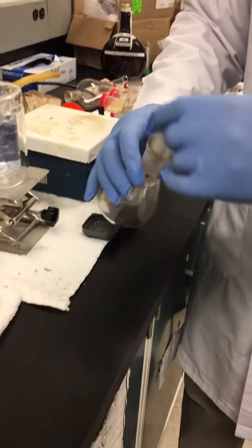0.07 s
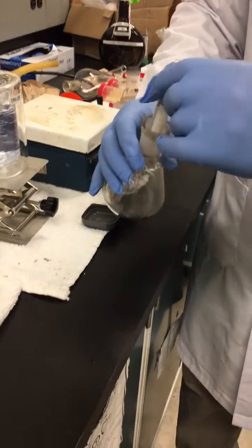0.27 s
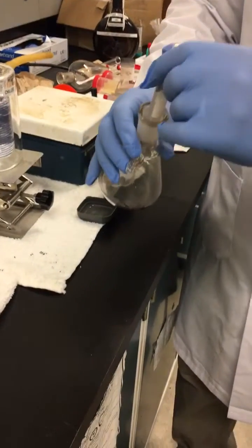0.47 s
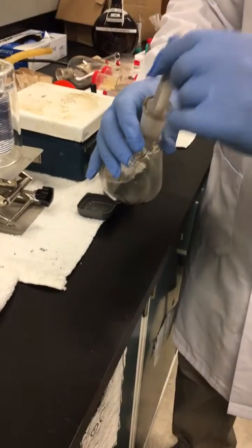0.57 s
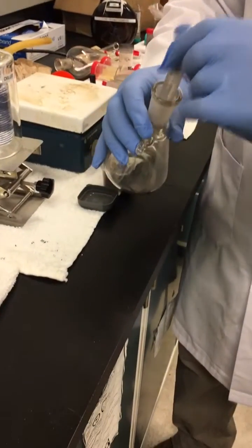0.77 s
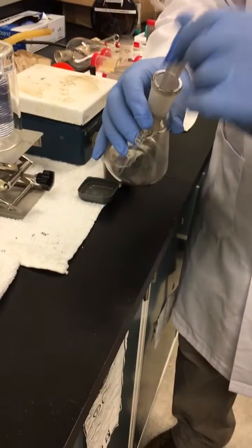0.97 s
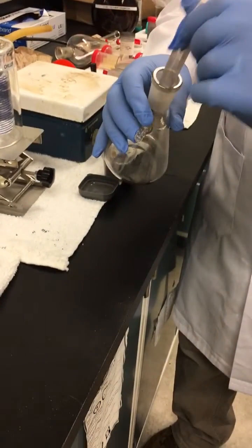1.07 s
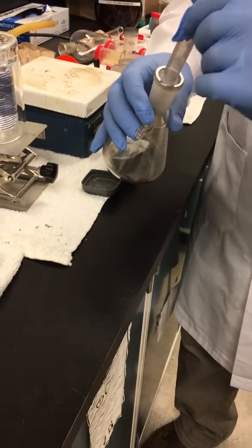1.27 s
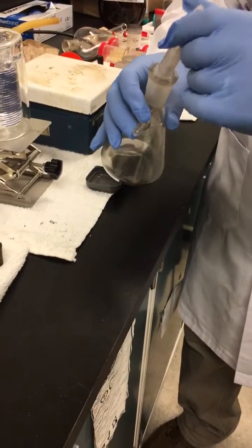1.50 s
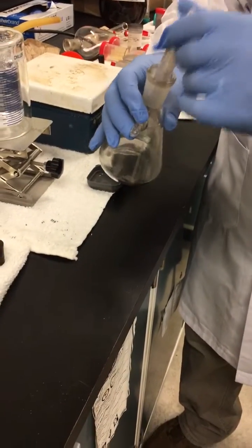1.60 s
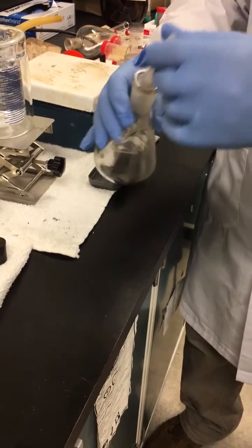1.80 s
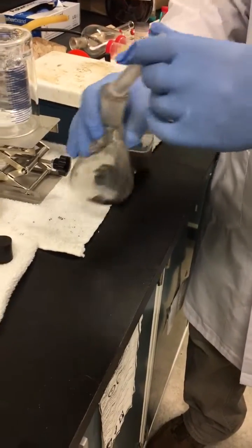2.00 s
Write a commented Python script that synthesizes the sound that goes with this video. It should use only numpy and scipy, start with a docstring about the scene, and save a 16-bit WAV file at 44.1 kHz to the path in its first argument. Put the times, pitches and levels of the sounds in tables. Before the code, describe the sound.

Close by, a glass stopper is worked loose from a flask. Quick, sharp clinks come first, then softer ground-glass scraping with light taps, and finally muffled knocks. Ventilation and equipment hum faintly in the small lab.

```python
"""Ventilation rumbles and equipment hums in a small laboratory, from start to finish.
A glass stopper is worked loose in the neck of a hand-held flask. First it clinks and rattles against
the rim, each impact exciting the modes of the glass. From about 0.4 s it slides with a fine frictional
scrape of ground glass, among light knocks, two faint clinks and a squeak. From about 1.4 s it ends in
dull knocks, damped by the gloves that hold it."""
import sys
import numpy as np
from scipy import signal
from scipy.fft import rfft, irfft
from scipy.io import wavfile

SR = 44100
rng = np.random.default_rng(int(sys.argv[2]) if len(sys.argv) > 2 else 0)


def wav_out(sig):
    """Save sig, one row per channel (or a flat mono array), as 16-bit PCM at SR to the path in sys.argv[1]."""
    wavfile.write(sys.argv[1], SR, np.round(np.clip(np.atleast_2d(sig).T, -1, 1) * 32767).astype(np.int16))


N = 90404
T = np.arange(N) / SR


def from_db(db):
    """Amplitude ratio of a level: tenfold for every 20 dB."""
    return 10 ** (np.asarray(db) / 20)


def unit_rms(x):
    """Normalisation to unit mean power."""
    return x / np.sqrt(np.mean(x ** 2) + 1e-20)


def curve(rows):
    """Linear interpolation between (time [s], level [dB]) points."""
    return np.interp(T, *np.transpose(rows))


def decay(t60):
    """Exponential decay: 60 dB in t60 seconds."""
    return from_db(-60 * T / t60)


def convolve(x, response):
    """A linear system's output is its input convolved with its impulse response."""
    return signal.fftconvolve(x, response)[:N]


def colour(x, spectrum):
    """Minimum-phase filter of unit power gain, falling 24 dB per octave outside the given spectrum."""
    hz, db = np.transpose(spectrum)
    grid = np.maximum(np.fft.rfftfreq(2 * N, 1 / SR), 1)
    octaves_outside = np.abs(np.log2(grid / np.clip(grid, hz[0], hz[-1])))
    gain = unit_rms(from_db(np.interp(np.log(grid), np.log(hz), db) - 24 * octaves_outside))
    cepstrum = irfft(np.log(gain + 1e-6))[:N]
    cepstrum[1:] *= 2  # a one-sided cepstrum makes the filter causal
    return irfft(rfft(x, 2 * N) * np.exp(rfft(cepstrum, 2 * N)))[:N]


def drift(hz):
    """Random fluctuation: noise low-passed at hz, with unit rms."""
    rolloff = 1 + (np.fft.rfftfreq(N, 1 / SR) / hz) ** 4
    return unit_rms(irfft(rfft(rng.standard_normal(N)) / rolloff, N))


def ring(times, db, hz, t60, build_s=.0005, flutter_hz=70):
    """A damped mode sums its blows' energy; room reflections make it waver slightly in level and phase."""
    power = np.zeros(N)
    for onset, level, ring_s in np.broadcast(times, db, t60):
        start = min(int(onset * SR), N - 1)
        age = T[:min(int(2 * ring_s * SR), N - start)]
        envelope = from_db(level - 60 * age / ring_s) * (1 - np.exp(-age / build_s))
        power[start:start + len(age)] += envelope ** 2
    phase = 2 * np.pi * (hz * T + rng.random()) + .35 * drift(flutter_hz)
    flutter = from_db(1.8 * drift(flutter_hz))
    return np.sqrt(power) * flutter * np.sin(phase)


def bursts(times, db, envelope, spectrum):
    """Dense, short-lived overtones merge into noise, so successive impacts add in power."""
    impacts = np.zeros(N)
    np.add.at(impacts, np.clip((times * SR).astype(int), 0, N - 1), from_db(2 * db))
    power = np.maximum(convolve(impacts, envelope ** 2), 0)
    return colour(np.sqrt(power) * rng.choice([-1, 1], N), spectrum)


def ventilation():
    """Stationary broadband noise: a low rumble of air under a faint hiss."""
    # spectra of the rumble and the hiss: (frequency [Hz], relative density [dB])
    rumble_spectrum = [(36, -7), (118, -0.5), (146, -4.5), (271, -8.5), (385, -19.5), (777, -28),
                       (1020, -25), (1300, -30.5), (2800, -40.5)]
    hiss_spectrum = [(1500, -2), (10000, -13), (16000, -8)]
    rumble = from_db(-48.5) * colour(rng.standard_normal(N), rumble_spectrum)
    hiss = from_db(-68) * colour(rng.standard_normal(N), hiss_spectrum)
    return rumble + hiss


def equipment_hum(waver_db=.5, waver_hz=4.7, drone_hz=121.4, drone_db=-5):
    """A line spectrum under slow amplitude modulation: four tones waver, a drone swells and sinks."""
    # steady equipment tones: (frequency [Hz], rms level [dB])
    hum_lines = [(59, -57), (177, -59), (268.7, -55.5), (698.5, -74)]
    # envelope of the strongest line: (time [s], relative level [dB])
    drone_levels = [(0, -38), (.12, -50.5), (.45, -59.5), (.54, -43.5), (1.08, -45.5), (1.22, -36.5),
                    (1.42, -49), (1.7, -58.5), (1.82, -45)]
    tones = [(hz, db + waver_db * drift(waver_hz)) for hz, db in hum_lines]
    tones.append((drone_hz, curve(drone_levels) + drone_db))
    return sum(np.sqrt(2) * from_db(db) * np.sin(2 * np.pi * (hz * T + rng.random())) for hz, db in tones)


def chirps(per_s=550, resonance_hz=6850, spread_octaves=.16, t60=.016, pitches=16):
    """Impulse excitation: random slips each start a damped sinusoid near the stopper's resonance."""
    out = 0
    for hz in resonance_hz * 2 ** (spread_octaves * np.linspace(-1, 1, pitches)):
        slips = (rng.random(N) < per_s / pitches / SR) * rng.uniform(.5, 1, N)
        out = out + convolve(slips, decay(t60) * np.sin(2 * np.pi * hz * T))
    return unit_rms(out)


def scrape(grains_per_s=4500, grain_spread_db=2.4, gain_db=-2, judder_db=1.8, judder_hz=55):
    """Sliding friction: ground glass gives a stream of tiny impacts and chirps, swelling at each rub."""
    # light drag of the sliding stopper: (time [s], relative level [dB])
    drag = [(.42, -80), (.8, -66), (1.11, -60), (1.14, -76), (1.2, -70), (1.46, -69), (1.52, -95)]
    # short rubs against the neck: (centre time [s], half-power duration [s], relative level [dB])
    rubs = [(.01, 0.042, -60), (0.454, 0.037, -61), (0.515, 0.021, -58.5), (0.571, 0.02, -56),
            (0.642, 0.013, -56.5), (.684, 0.013, -51), (.714, 0.008, -53.5), (0.752, 0.026, -54),
            (0.807, 0.018, -59), (0.859, .016, -54.5), (0.9, 0.045, -58), (0.946, 0.017, -53.5),
            (0.977, 0.013, -59), (1.023, 0.079, -60), (1.074, 0.025, -51), (1.105, 0.023, -54),
            (1.174, .01, -61), (1.205, 0.035, -56.5), (1.315, 0.013, -53.5), (1.445, 0.013, -59.5),
            (1.75, .022, -67)]
    # spectrum of the grains: (frequency [Hz], relative density [dB])
    grain_spectrum = [(1500, -8.5), (2750, -15), (3450, -1.5), (4000, -11), (6800, -8.5), (9000, -2.5),
                      (10300, -11), (11500, -6), (15500, -12.5)]
    sizes = from_db(grain_spread_db * np.minimum(rng.exponential(1, N), 4)) * rng.choice([-1, 1], N)
    contacts = rng.random(N) < grains_per_s / SR
    grains = colour(unit_rms(sizes * contacts), grain_spectrum)
    rub_power = sum(from_db(2 * db) * .5 ** ((2 * (T - centre) / length) ** 2)
                    for centre, length, db in rubs)
    envelope = np.sqrt(from_db(2 * curve(drag)) + rub_power)
    judder = from_db(gain_db + judder_db * drift(judder_hz))
    return envelope * judder * (grains + from_db(1) * chirps())


def clinks(splash_db=-9.5, splash_t60=.05, reflection_db=-.5, reflection_s=.0056):
    """Modal ringing: the point of impact weights the modes, and a lingering contact damps them."""
    # blows on the rim: (time [s], level of each of the four registers [dB], decay time factor [1])
    blows = [(0.0815, -38, -69, -70, -72, 0.1), (0.2164, -19, -14.5, -32, -19.5, 0.34),
             (0.222, -60, -46, -17, -18.5, 0.82), (0.229, -30, -48, -34, -36, 1.3),
             (0.276, -30, -30.5, -48, -51, 0.7), (0.2817, -20.5, -53, -49, -29.5, 1.33),
             (0.285, -35, -20.5, -40, -38, 0.29), (0.3112, -24.5, -32.5, -34, -56, 0.55),
             (0.3395, -45, -46, -40, -51, 1.1), (0.404, -33, -37, -39, -47, 0.77),
             (1.1568, -56, -56, -28.5, -64, 0.17), (1.228, -42, -58, -42, -50, 0.57)]
    # registers that group the modes: (centre frequency [Hz])
    registers_hz = [3400, 6000, 6800, 11000]
    # modes of the glass: (frequency [Hz])
    modes_hz = [3388, 3607, 5555, 6096, 6808, 10185, 10429, 10994, 11110, 11290, 11781, 12290, 14730, 15380]
    # the same modes, in order: (relative level [dB], t60 [s])
    modes = [(-3.5, 0.14), (-15.5, .07), (-17.5, 0.11), (1.5, 0.063), (-3.5, 0.053), (-12.5, 0.037),
             (-4, 0.036), (-2, 0.045), (-17, 0.077), (-15, .05), (-3.5, 0.04), (-18, .055), (-17, .05),
             (-15, 0.05)]
    # splash of brief overtones at each blow: (frequency [Hz], relative density [dB])
    splash_spectrum = [(700, -25.5), (2700, -18), (3500, 8), (4300, -12), (6000, 2), (8500, -3.5),
                       (11000, 5), (13500, -14), (15300, -6.5)]
    times, *register_db, decay_factor = np.transpose(blows)
    out = bursts(times, register_db[-1] + splash_db, decay(splash_t60), splash_spectrum)
    for hz, (db, t60) in zip(modes_hz, modes):
        register = np.argmin(np.abs(np.log(hz / np.array(registers_hz))))
        onsets, levels, ring_s = times, register_db[register] + db, t60 * decay_factor
        if register > 0:  # the bench reflects the upper modes a moment later
            onsets = np.r_[onsets, onsets + reflection_s]
            levels = np.r_[levels, levels + reflection_db]
            ring_s = np.r_[ring_s, ring_s]
        out = out + ring(onsets, levels, hz, ring_s)
    return out


def knocks(body_t60=.015, tick_t60=.0054, click_t60=.01155, loose_s=1.35, grip_db=-6):
    """Heavy damping by the gloves leaves a hollow body, a bright tick, a sharp click and little ring."""
    # stopper striking the neck: (time [s], body level [dB], tick level [dB], click level [dB])
    contacts = [(0.0824, -52, -47, -61), (0.1059, -44.5, -39, -50), (0.2171, -50, -27, -32),
                (0.272, -40.5, -39, -43), (0.2812, -60, -23, -27.5), (0.616, -47, -50, -51),
                (0.735, -50.5, -49, -79), (0.746, -48.5, -43.5, -58), (0.7936, -47.5, -39.5, -59),
                (0.948, -54, -45.5, -60), (1.1557, -47, -42, -62), (1.3994, -45, -41, -46.5),
                (1.4797, -47, -45.5, -48.5), (1.487, -48, -54, -53), (1.4942, -38.5, -44, -61),
                (1.6045, -42.5, -44, -43.5), (1.6122, -43.5, -45.5, -54), (1.6228, -46, -47.5, -61),
                (1.7847, -47, -54, -60), (2.021, -41.5, -40, -61), (2.0447, -43, -46, -67)]
    # spectra of the three parts: (frequency [Hz], relative density [dB])
    body_spectrum = [(300, -35), (700, -5), (1000, 1), (1600, -3), (2300, 0), (2800, -13), (4500, -14.5),
                     (8000, -14)]
    tick_spectrum = [(2000, -23), (3400, 3), (5600, -1.5), (6100, 7), (6900, 9), (7800, -6.5), (9100, 3),
                     (10300, -25.5)]
    click_spectrum = [(9500, -3), (13500, -.5), (15500, -4.5)]
    # modes that still ring under the gloves: (frequency [Hz], relative level [dB], t60 [s])
    body_modes = [(880, -12, 0.048), (1115, -5.5, 0.032), (1565, -12.5, 0.1), (2055, -15.5, .05),
                  (2370, -13, 0.057)]
    tick_modes = [(3400, -12.5, 0.053), (6076, -0.5, 0.05), (6300, -12, 0.034), (6785, -5, 0.057)]
    times, body_db, tick_db, click_db = np.transpose(contacts)
    scatter = from_db(-14) * decay(t60=.15)  # off the bench and nearby things
    held_db = grip_db * (times < loose_s)  # the ring is weaker until the stopper comes loose
    out = bursts(times, click_db, decay(click_t60) + scatter, click_spectrum)
    for levels, burst_t60, spectrum, modes in [(body_db, body_t60, body_spectrum, body_modes),
                                               (tick_db, tick_t60, tick_spectrum, tick_modes)]:
        out = out + bursts(times, levels, decay(burst_t60) + scatter, spectrum)
        out = out + sum(ring(times, levels + db + held_db, hz, t60) for hz, db, t60 in modes)
    return out


def squeak(t60=.022):
    """Stick-slip: the stopper catches once and briefly excites four high modes."""
    # the catch: (time [s], level [dB])
    catches = [(1.278, -51)]
    # modes of the squeak: (frequency [Hz], relative level [dB])
    modes = [(5650, 1), (8600, -15), (11900, -4), (13900, 8)]
    times, levels = np.transpose(catches)
    return sum(ring(times, levels + db, hz, t60) for hz, db in modes)


def reverberation(x, level_db=-16, t60=.19, delay_s=.018):
    """The laboratory's diffuse field: dense reflections form a short, exponentially decaying tail."""
    tail = rng.standard_normal(N) * decay(t60) * (T > delay_s)
    return from_db(level_db) * convolve(x, tail / np.linalg.norm(tail))


def scene():
    """Superposition of the background, the flask's direct sound and its reverberation, in mono."""
    background = ventilation() + equipment_hum()
    glass = scrape() + clinks() + knocks() + squeak()
    return (background + glass + reverberation(glass))[None]


def record(dry):
    """Band limiting: a steep elliptic low-pass removes the highest treble."""
    cutoff_hz = 15750
    return signal.sosfilt(signal.ellip(10, .1, 80, cutoff_hz, fs=SR, output="sos"), dry)


dry = scene()
out = record(dry)
wav_out(out)
```